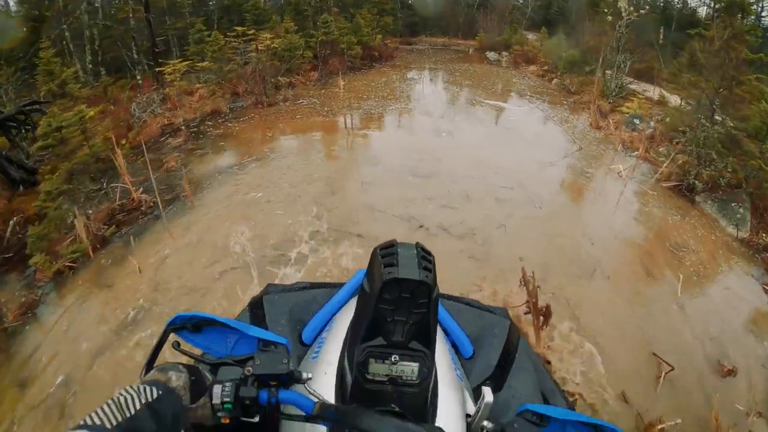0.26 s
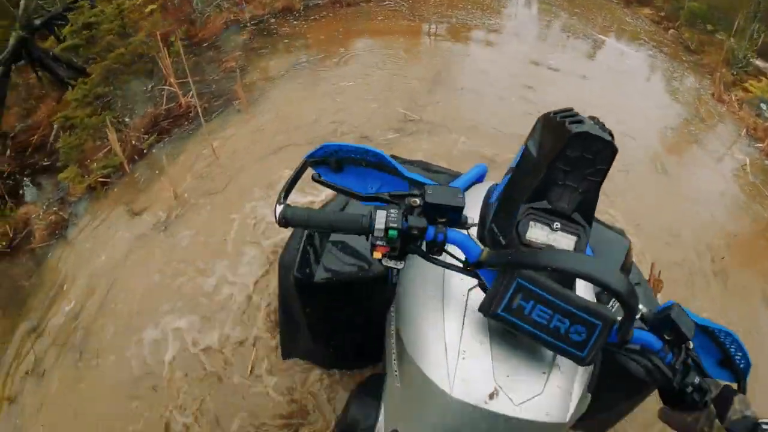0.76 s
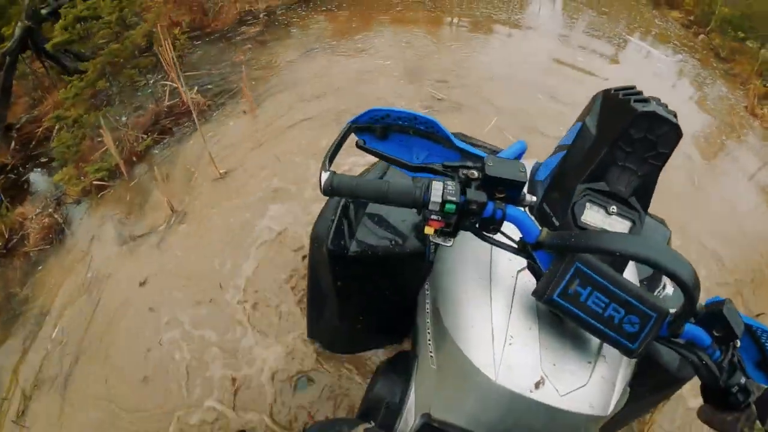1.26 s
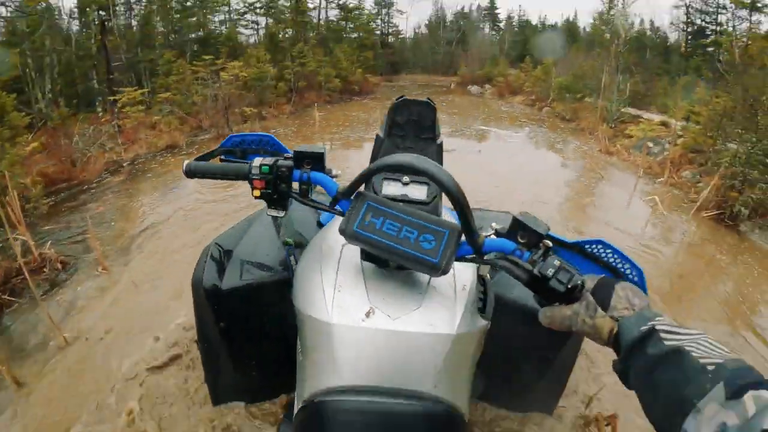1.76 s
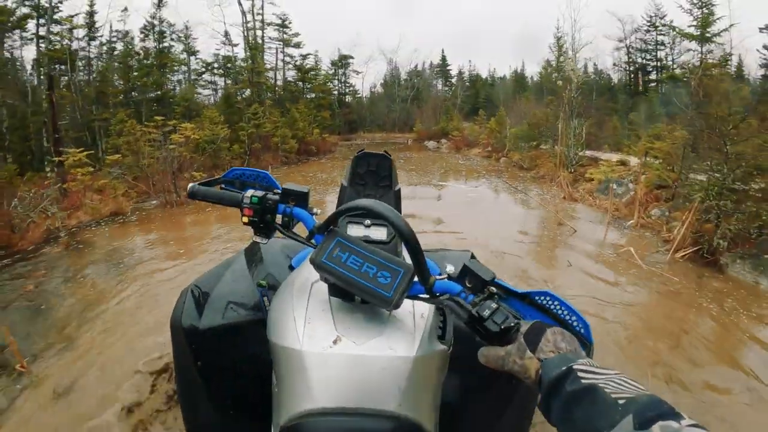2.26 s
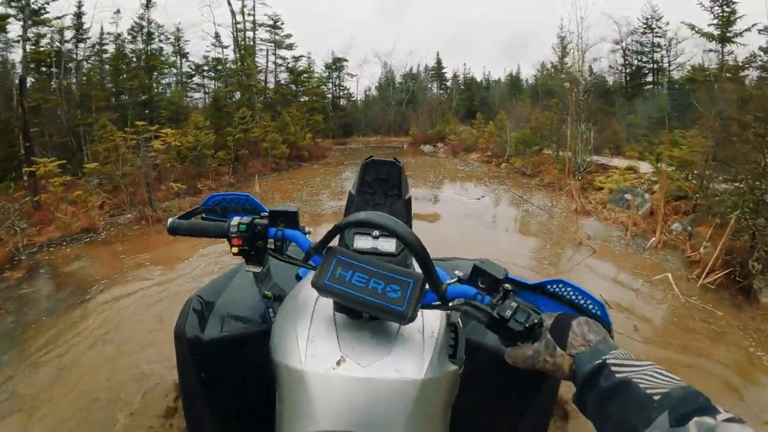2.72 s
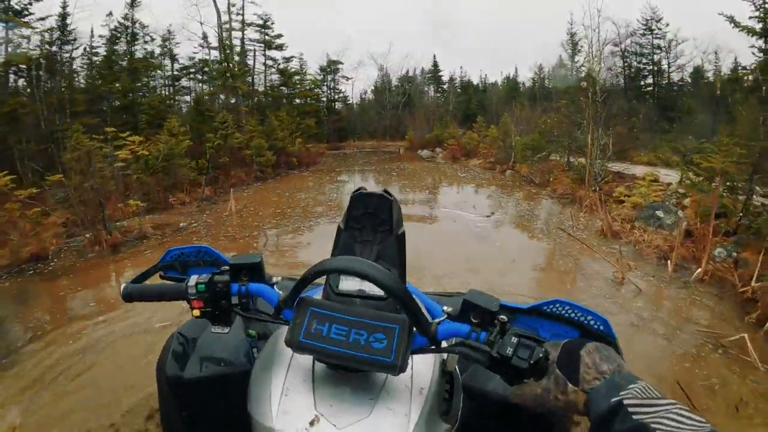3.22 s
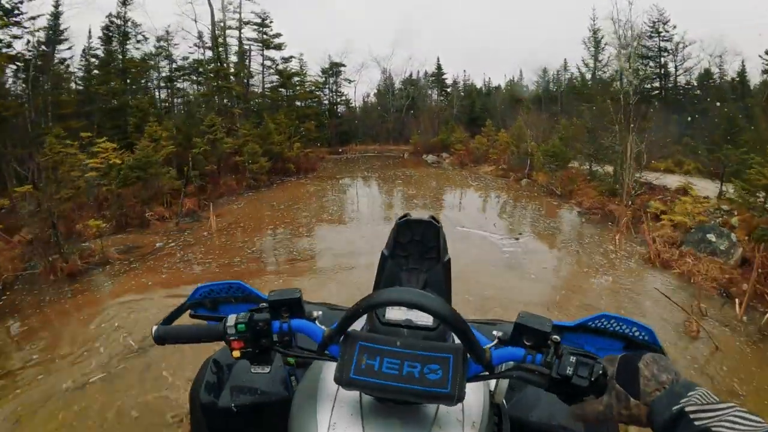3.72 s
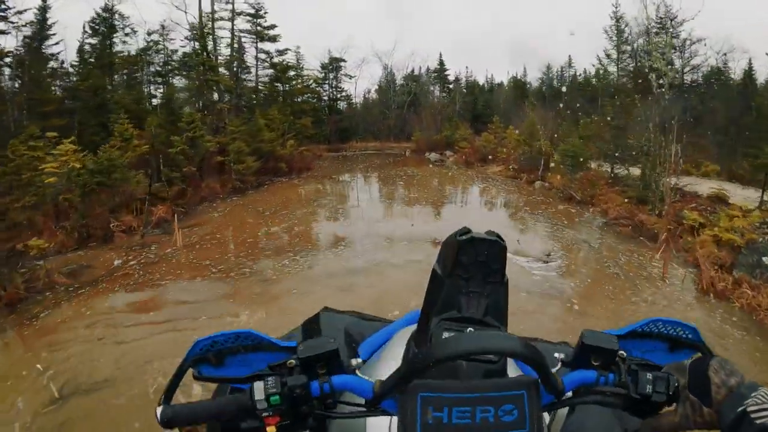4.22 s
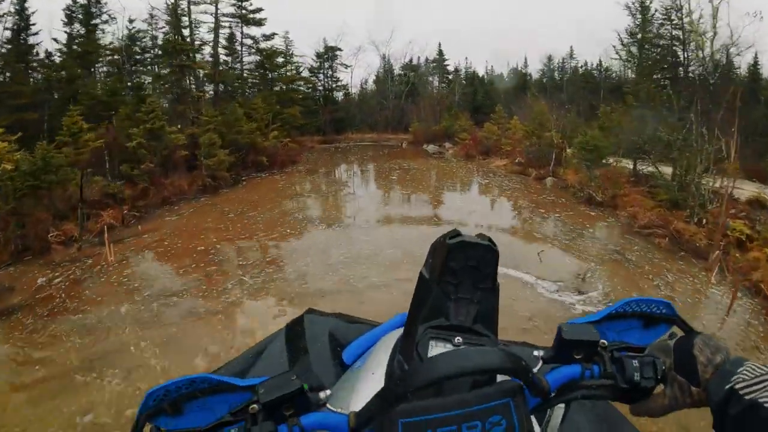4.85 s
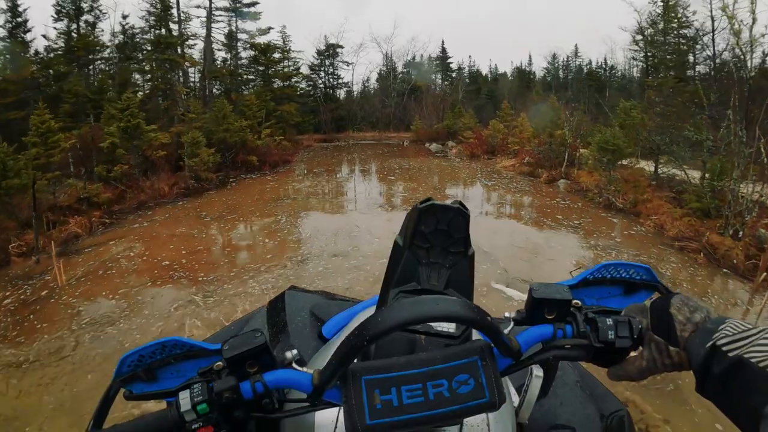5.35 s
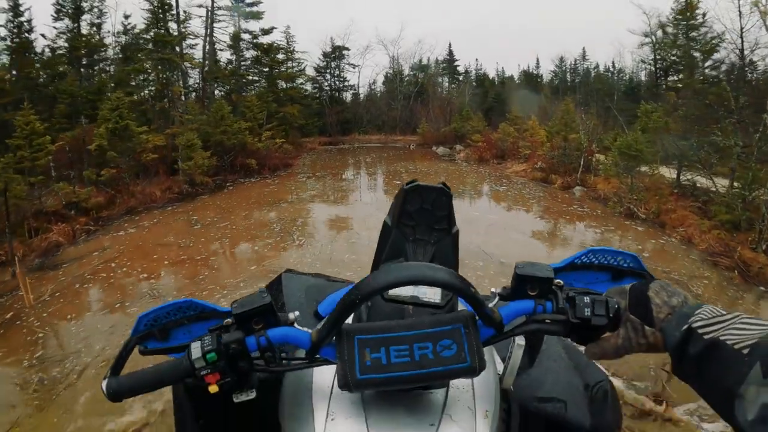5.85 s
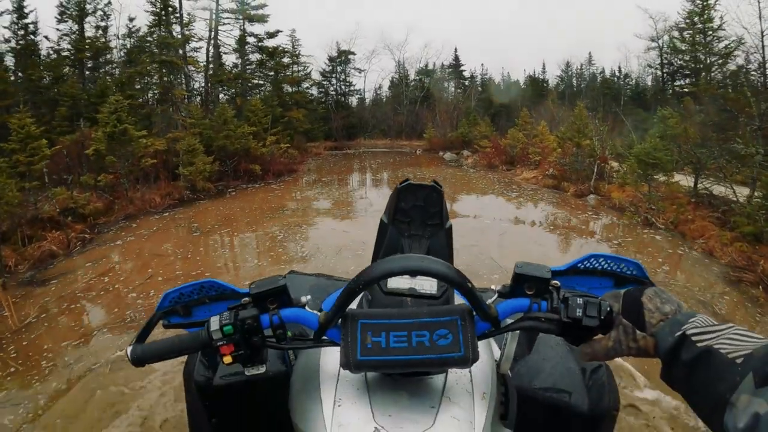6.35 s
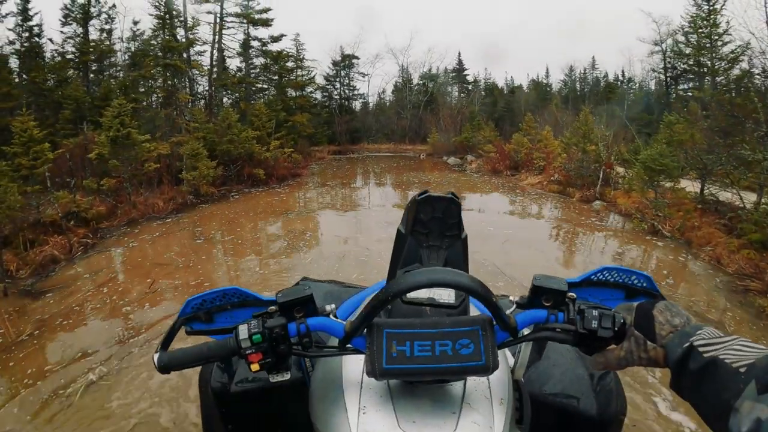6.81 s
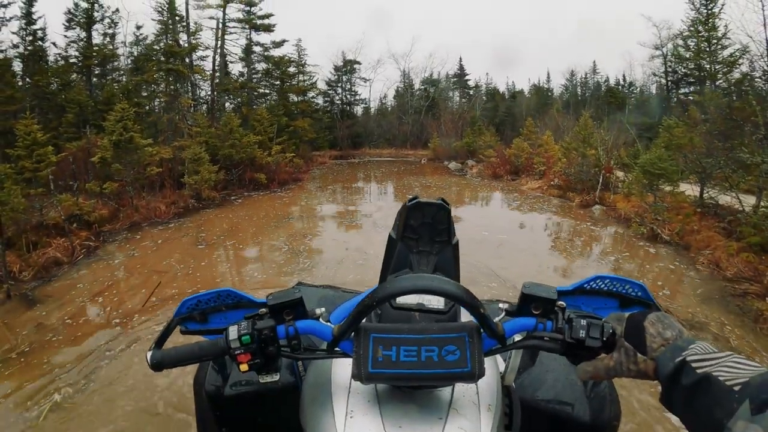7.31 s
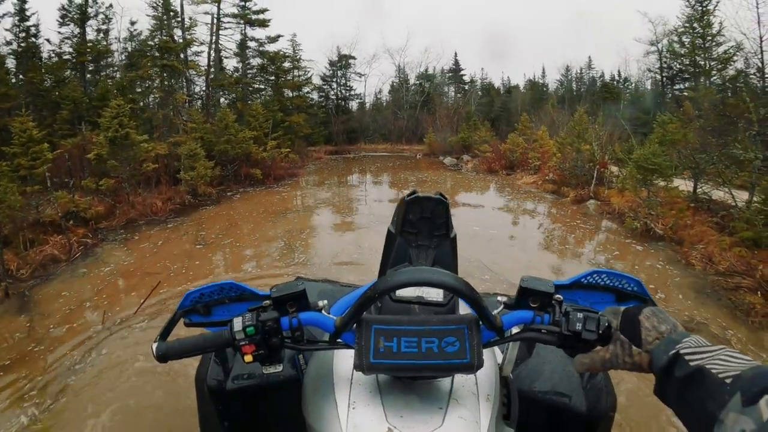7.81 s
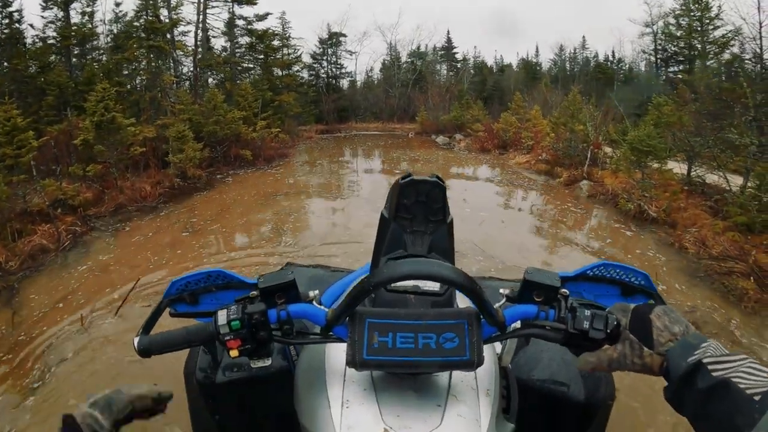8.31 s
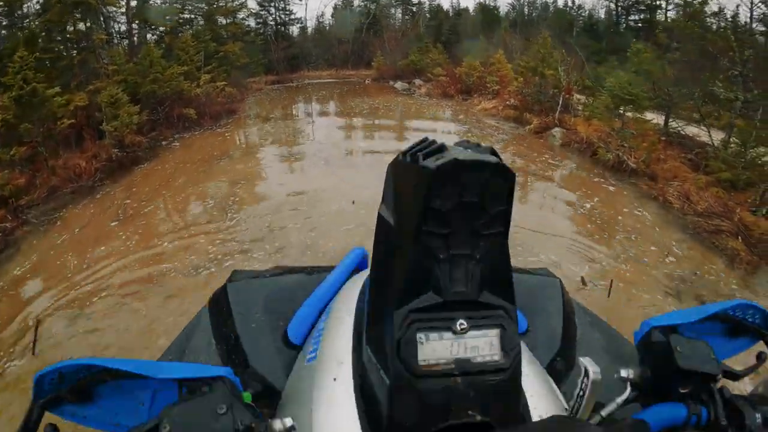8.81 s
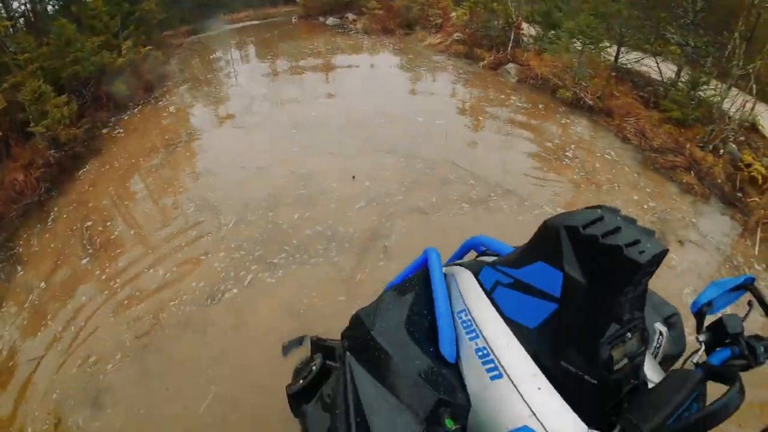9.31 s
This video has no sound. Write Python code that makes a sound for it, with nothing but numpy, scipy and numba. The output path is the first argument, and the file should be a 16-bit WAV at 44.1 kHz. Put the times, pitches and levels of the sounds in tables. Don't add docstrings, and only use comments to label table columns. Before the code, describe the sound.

Close mono helmet microphone, outdoors, little bass depth, soft treble. Uneven paired exhaust puffs dominate, with hollow intake gulps, ringing pipes and rattling casings. The engine revs briefly, sags, digs in and growls steadily through churning water for about four seconds, stutters, then idles slowly with breathy hisses each cycle. Light water fizz and a few drops on plastic sit far underneath.

```python
import sys
import numpy as np
from scipy import signal
from scipy.fft import rfft, irfft
from scipy.io import wavfile
from scipy.ndimage import uniform_filter1d
from numba import njit

SR = 44100
rng = np.random.default_rng(int(sys.argv[2]) if len(sys.argv) > 2 else 0)


def gain_from_decibels(decibels):
    exponent = np.asarray(decibels, float) / 20
    return 10 ** exponent


def bounce(signal):
    frames = np.transpose(np.atleast_2d(signal))
    limited = np.clip(frames, -1, 1)
    pcm = np.round(limited * 32767).astype(np.int16)
    wavfile.write(sys.argv[1], SR, pcm)


N = 422026
T = np.arange(N) / SR


# (time [s], four-stroke cycle rate [Hz])
SPEED = [(0.0, 18.008), (0.065, 18.626), (0.278, 26.928), (0.408, 17.783), (0.606, 14.26), (1.05, 13.903),
         (1.284, 18.486), (1.899, 17.583), (2.691, 18.048), (3.091, 21.374), (5.063, 19.045),
         (5.278, 20.405), (5.562, 14.142), (5.754, 18.152), (5.999, 14.012), (6.609, 12.935),
         (7.076, 11.032), (9.57, 11.427)]
# (time [s], change of cycle rate [Hz])
SPEED_BUMPS = [(0.48, 3.436), (1.832, 0.492), (2.513, 0.506), (3.636, 0.355), (3.838, -0.396), (4.128, 0.575),
               (4.428, 0.241), (4.961, 0.191), (7.449, 0.609), (7.978, -0.062), (8.296, 0.198), (9.104, -0.489),
               (9.524, -0.535)]


def crank_phase():
    cycles_hz = track(SPEED, T)[0] + swells([(s, .09, hz) for s, hz in SPEED_BUMPS], T)
    return .171 + np.cumsum(cycles_hz) / SR


REAR_CYCLES = dict(base=.372, revs=.008, damped=.003)
REAR_DB = dict(base=-1.5, flow=-5, clear=1.5, damped=3.5, revs=0.5, shut=0)
# (time [s], level [dB])
MISFIRES = [(.01, -13), (.025, -11), (.045, -11), (.065, -20), (.325, -11), (.348, -2), (.394, -5),
            (.412, -10), (.443, -11), (.606, -5.5), (.63, -12), (5.362, -19), (5.397, -5), (5.543, -26.5),
            (5.847, -13), (5.886, -6), (9.379, -5), (9.202, -0.5), (.297, -2), (.46, -2), (.51, -6),
            (.697, -10.5)]
# (time [s], delay after the front firing [cycles])
SUCTION = [(0, .64), (.19, .67), (.29, .69), (.4, .63), (.58, .565), (.72, .575), (.86, .59), (1.1, .61),
           (1.39, .603), (2.16, .605), (2.7, .602), (3.1, .645), (3.6, .64), (4.15, .615), (4.93, .616),
           (5.8, .615), (6.15, .58), (6.5, .58), (6.9, .655), (9.57, .655)]


def strokes(phase):
    cycle = np.arange(0, int(phase[-1]) + 1)
    front = np.interp(cycle, phase, T)
    rough_db, shut = track(BURN, front)
    chance = rng.standard_normal((8, len(cycle)))
    uneven = rough_db * chance
    idle = np.clip(rough_db - 1, 0, 1) * shut ** 4
    lope = idle * (-1) ** cycle
    rear_delay = follow(REAR_CYCLES, front) + .0015 * uneven[0] + .0125 * lope - .013 * idle
    back = np.interp(cycle + rear_delay, phase, T)
    fires = np.r_[front, back]
    rear_db = follow(REAR_DB, back) + .4 * uneven[2] + 1.8 * lope - 1.8 * idle
    uneven_db = np.r_[.2 * uneven[1], rear_db]
    for s, weak_db in MISFIRES:
        uneven_db[np.argmin(abs(fires - s))] = weak_db
    gulp_delay = track(SUCTION, front)[0] + .031 * lope + .003 * uneven[3]
    gulp = np.interp(cycle + gulp_delay, phase, T)
    return dict(front=front, back=back, fires=fires, gulp=gulp, idle=idle, lope=lope,
                chance=chance, uneven=uneven, uneven_db=uneven_db)


def by_cylinder(e, front, rear):
    return np.r_[front + 0 * e["front"], rear + 0 * e["back"]]


EXHAUST_DB = dict(base=-17.5, flow=6, clear=3, revs=0.05, shut=3)
PUFF_HZ = dict(base=172.1, clear=24.1, shut=-9.5, scatter=3.73)
PUFF_RISE_MS = dict(base=3.53, shut=0.048, damped=-0.14, clear=-1)
PUFF_FALL_MS = dict(base=2, shut=-0.073, damped=0.033, clear=-0.45)
ECHO_MS = dict(base=14.9, revs=-2.31, clear=-0.65, damped=-0.91, shut=0.45)
ECHO_DB = dict(base=-3.5, clear=-8.5, damped=1.4, shut=-2.5, revs=0.56)
REAR_ECHO_DB = dict(base=-4.5, clear=-3.4, damped=1, shut=2)
# (time [s], half width [s], change [Hz])
HOT_PUFFS = [
    (.2, .1, 13.5),
    (.75, .2, 4.1),
    (1.5, .3, 8),
    (3.0, .3, 2),
    (4.1, .3, 3),
    (4.9, .3, 4.3),
    (6.35, .3, 8),
]


def exhaust(e):
    fires, idle = e["fires"], e["idle"]
    size_db = follow(EXHAUST_DB, fires) + 8.5 + e["uneven_db"]
    hz = follow(PUFF_HZ, fires)
    echo_s = follow(ECHO_MS, fires) / 1000
    rise_ms = follow(PUFF_RISE_MS, fires) + by_cylinder(e, 0, .81)
    pipe = puffs(fires, size_db, hz + swells(HOT_PUFFS, fires), rise_ms, follow(PUFF_FALL_MS, fires))
    rear_echo_db = follow(REAR_ECHO_DB, e["back"]) + 5.5 * idle + 1.8 * e["lope"]
    echo_db = size_db + follow(ECHO_DB, fires) + by_cylinder(e, 0, rear_echo_db)
    echo_hz = .82 * hz * by_cylinder(e, 1, 1 + .2 * idle)
    pipe += puffs(fires + echo_s, echo_db, echo_hz, 4.5, by_cylinder(e, 1.98, 1.98 + 4 * idle))
    return pipe + puffs(fires + 2 * echo_s, size_db - 27, .31 * hz, .98, 8.7)


GULP_DB = dict(base=-7.5, flow=-3.5, revs=8.5, damped=-3.5)
BOX_HZ = dict(base=219.2, shut=-4.8, damped=8, clear=10, revs=-13)
BOX_RISE_MS = dict(base=3.03, shut=0.52, damped=0.1, revs=0.1)
BOX_RING_MS = dict(base=21.5, damped=-20.5)
SECOND_GULP_DB = dict(base=-15, shut=4, damped=3, revs=-0.5)
# (time [s], half width [s], level on the gulp [dB])
BOOMS = [(0.382, 0.014, 4), (0.64, 0.011, 15.5), (0.71, 0.83, -7), (1.62, 0.39, 8), (5.5, 0.1, -2.5),
         (0.46, .02, 0), (.72, .02, 6.5), (.79, .02, 5.5), (.857, .02, -1), (8.95, .03, -0.5),
         (4.95, .3, 2.5), (4.5, 0.22, 2.5)]
# (time [s], half width [s], change of note [Hz], change of ring [ms])
BOX_SHIFTS = [
    (1.49, .25, 14, 1.5),
    (2.301, 0.28, 0.56, -1.3),
    (3.1, .25, 0.5, 1.4),
    (3.8, .2, 9.5, -1),
    (4.341, .25, 6.1, -0.5),
    (4.954, 0.28, 13, -0.5),
    (.2, 0.15, 18, 0.5),
    (0.757, .2, 12, 0),
    (6.35, 0.45, 9.5, -1.5),
]


def air_box(e):
    gulp, idle, lope, uneven = e["gulp"], e["idle"], e["lope"], e["uneven"]
    out_db = follow(EXHAUST_DB, gulp)
    gulp_db = out_db + 10.5 + follow(GULP_DB, gulp) + swells(BOOMS, gulp)
    gulp_db = gulp_db + .55 * uneven[4] + .24 * lope - 2.5 * idle
    shift_hz = swells([(s, w, hz) for s, w, hz, ms in BOX_SHIFTS], gulp)
    shift_ms = swells([(s, w, ms) for s, w, hz, ms in BOX_SHIFTS], gulp)
    box_hz = (follow(BOX_HZ, gulp) + shift_hz) * (1 + .012 * uneven[5]) * (1 - .043 * idle)
    rise_ms = follow(BOX_RISE_MS, gulp) + 3.8 * idle
    ring_ms = (follow(BOX_RING_MS, gulp) + shift_ms) * gain_from_decibels(uneven[6] - 1.2 * lope - .66 * idle)
    box = -puffs(gulp, gulp_db, box_hz, rise_ms, np.clip(ring_ms, 2, 23), glide=.62 * idle)
    second_db = out_db + 11 + follow(SECOND_GULP_DB, gulp) - 3.5 * idle + .8 * uneven[1]
    box += puffs(gulp + 12.75 / 1000, second_db, 1.28 * follow(PUFF_HZ, gulp), 1.5, 2.1)
    boom = level(noise_band(follow(PUFF_HZ, T), 110., 130.), 0)
    rough_db, shut = track(BURN, T)
    return box + gain_from_decibels(follow(EXHAUST_DB, T) - 25 + 6 * rough_db - 5 * shut ** 4) * boom


HEADER_DB = dict(base=-44.5, flow=20, revs=1.3)
HEADER_HZ = dict(base=329.3, revs=43.5)
# (time [s], front lead [ms], rear lead [ms])
HEADER_LEAD = [(0, 2.9, 2.9), (.3, 2.4, 2.6), (1.0, 2.4, 3.6), (1.5, 2.4, 4.5), (2.3, 2.25, 5.1),
               (2.7, 2.36, 4.3), (3.0, 2.36, 3.54), (3.5, 2.75, 2.8), (3.8, 2.94, 3.05), (4.3, 2.34, 2.7),
               (4.55, 2.8, 3.3), (4.95, 2.5, 2.86), (5.3, 3.1, 3), (5.9, 1.7, 3.7), (9.57, 3.2, 4.2)]
# (time [s], half width [s], level [dB])
HEADER_SWELLS = [
    (.2, 0.063, 2),
    (1.45, 0.25, -8.5),
    (2.5, 0.36, 1),
    (3.2, 0.26, 5),
    (4, 0.44, 1.5),
    (5.1, 0.52, -3),
    (5.75, 0.23, -8.5),
]
# (time [s], half width [s], change [Hz])
HEADER_REVVED = (.2, 0.11, 36)


def headers(e):
    fires, gulp = e["fires"], e["gulp"]
    lead_ms = by_cylinder(e, track(HEADER_LEAD, e["front"])[0], track(HEADER_LEAD, e["back"])[1])
    ring_db = follow(HEADER_DB, fires) + e["uneven_db"]
    hz = (follow(HEADER_HZ, fires) + swells([HEADER_REVVED], fires)) * by_cylinder(e, 1, 1.01)
    fire_db = ring_db + swells(HEADER_SWELLS, fires) + 9 + by_cylinder(e, 0, 3)
    ring = puffs(fires - lead_ms / 1000, fire_db, hz, by_cylinder(e, 2.8, 3.6), by_cylinder(e, 2.6, 7))
    gulp_db = follow(HEADER_DB, gulp) - 4.5 + 5 * e["idle"] + 3 * e["lope"]
    ring += puffs(gulp + .003, gulp_db, 340, .59, 13)
    return ring - puffs(fires + .00216, ring_db - 5.5, 510, 8.7, 3.9)


BARK_DB = dict(base=-60.5, flow=15, damped=12, shut=15)
# (time [s], half width [s], level on the bark [dB])
BARK_SWELLS = [(.62, 0.37, -1), (2.9, 0.33, -6), (4.05, 0.29, 4.5), (5.48, 0.084, -15), (8.75, 0.21, -10.5),
               (9.45, 0.2, -8.5), (6.35, 0.16, 3), (.2, 0.17, -7), (1.7, 0.13, -4), (2.4, 0.27, -2),
               (9.015, .01, 3), (9.075, 0.011, -4), (9.165, 0.011, -10), (9.198, 0.0083, 2.5), (9.255, .012, -8),
               (4.17, 0.016, -1), (4.37, 0.018, -3)]


def bark(e):
    chance = e["chance"]
    edge = e["fires"] - .0047
    soft = track(BURN, edge)[1]
    rear_luck = chance[6] - 5 + 4 * track(BURN, e["back"])[1] + .5 * e["idle"] + 2 * e["lope"]
    edge_db = follow(BARK_DB, edge) + swells(BARK_SWELLS, edge) + 12 + e["uneven_db"]
    edge_db = edge_db + 1.5 * np.r_[chance[7], rear_luck]
    edge_hz = 620 - 165 * soft + swells([(9.1, .3, 140)], edge)
    edges = -puffs(edge, edge_db, edge_hz, .3 + 1.2 * soft, 1.4 + 1.6 * soft)
    shut = track(BURN, T)[1]
    rasp = level(noise_band(520, 220., 220.), 0)
    rasp = rasp - shut * svf(rasp, 820 + 0 * T, 400.)
    blowing = .25 + puffs(e["fires"], 0, 1, 3, 7) + puffs(e["gulp"], -3, 1, 4, 9)
    rasp_db = follow(BARK_DB, T) + swells(BARK_SWELLS, T) - 4 - 5 * shut + 1.5 * walk(40)
    return edges + gain_from_decibels(rasp_db) * blowing * rasp


CRACK_DB = dict(base=-63, labour=35.5)
# (time [s], half width [s], level [dB])
KNOCKS = [(.092, .01, 0), (.14, .012, 3), (1.09, 0.028, 11), (1.3, 0.072, 4), (1.381, .02, -6),
          (1.49, .02, 11), (1.8, 0.085, 10), (1.99, 0.023, 9), (2.103, .02, 2), (2.41, 0.059, -2.5),
          (2.74, 0.062, 5), (2.818, 0.011, 7), (4.02, .06, -4), (4.17, 0.05, -13), (4.37, 0.025, -11),
          (4.75, 0.027, 7), (4.93, .02, 1), (5.14, .02, -2), (5.27, .07, -7), (5.76, .03, 0)]


def crack(e):
    front, chance = e["front"], e["chance"]
    crack_db = follow(CRACK_DB, front) + swells(KNOCKS, front - .0045) + 2.5 + .7 * chance[5]
    return puffs(front - .005, crack_db, 1350 * gain_from_decibels(.5 * chance[4]), .25, 1.6)


HISS_DB = dict(base=-59.5, flow=3, revs=-8.5)
# (centre [Hz], width [Hz], level [dB])
DUCT = [(1070, 50, -8), (1290, 75, 0), (1450, 70, -1), (1600, 80, -4), (1760, 90, -11), (2330, 110, -15),
        (2920, 100, -17), (4330, 90, -20), (5580, 150, -15), (3650, 110, -18), (6770, 100, -24)]
# (time [s], half width [s], level over the hiss [dB])
SUCKS = [(.2, .06, 18), (1.07, 0.048, 6.5), (6.25, 0.26, 1.5), (7.2, 0.053, 5.5), (8.56, 0.033, 2.5),
         (8.82, 0.016, -8), (9.09, 0.093, 2.5), (9.26, 0.044, 3.5), (9.5, 0.15, -10), (.045, 0.011, 9),
         (.4, .015, 17), (7.6, 0.22, 0.5), (8.1, 0.26, -1.5), (8.35, 0.094, 1.5), (8.69, .03, 3.5)]
# (time [s], half width [s], level [dB])
DUCT_TOP = [
    (6.4, .25, -3.5),
    (7.1, 0.38, 3.5),
    (7.7, 0.16, -2.5),
    (8.45, 0.21, -1.5),
    (9.1, 0.23, 1),
]
# (time [s], half width [s], level [dB])
DUCT_WET = (10, .3, 13)


def throttle(phase):
    gate, sag = 0, 1
    strength = gain_from_decibels(rng.standard_normal((int(phase[-1]) + 1, 2)))
    for k, (opens, lasts, db, fall) in enumerate([(.071, .21, 2.2, .038), (.665, .22, 1.5, .14)]):
        u = (phase - opens) % 1 / lasts
        sag = sag + fall * np.where(u < 1.5, .5 - u, 0)
        stroke = np.clip(u * 12, 0, 1) * np.clip(1.5 - .72 * u, 0, 1) ** 2
        gate = gate + gain_from_decibels(db) * strength[phase.astype(int), k] * stroke
    duct = 0
    for hz, width, db in DUCT:
        centre = hz * (1 + .007 * walk(12)) * (sag if hz < 2000 else 1)
        note_db = db + 2 * walk(13)
        if hz > 2500:
            note_db = note_db + swells(DUCT_TOP, T)
        elif hz > 2000:
            note_db = note_db + swells([DUCT_WET], T)
        duct = duct + gain_from_decibels(note_db) * noise_band(centre, 2.2 * width, 6. * width)
    hiss_db = follow(HISS_DB, T) + swells(SUCKS, T) + 16
    return track(BURN, T)[1] * gain_from_decibels(hiss_db) * level(gate * duct, 0)


# (multiple of the cycle rate, level with the throttle shut [dB])
ROCKING = [(3, -41.5), (4, -36.5), (5, -35), (6, -41.5), (8, -34.5)]
# (time [s], half width [s], level [dB])
LURCHES = [
    (0.005, 0.022, -21),
    (0.434, .05, -31.5),
    (0.89, .15, -38),
    (5.456, 0.034, -41.5),
    (5.872, 0.044, -40),
]


def frame(phase):
    thud = level(svf(rng.standard_normal(N), 62 + 0 * T, 38.), 0)
    thud = thud * swells([(s, w, gain_from_decibels(db)) for s, w, db in LURCHES], T)
    rocking = sum(gain_from_decibels(db + 2.4 * walk(8.1)) * np.sin(2 * np.pi * k * phase) for k, db in ROCKING)
    return thud + track(BURN, T)[1] * rocking


# (time [s], length [s], level [dB], start [Hz], top [Hz])
SQUEALS = [
    (1.752, .18, -43, 1265, 1440),
    (1.708, .018, -44, 1270, 1270),
    (2.638, .2, -47, 1265, 1270),
    (5.368, .13, -42.5, 1440, 1370),
    (5.772, 0.13, -43, 1400, 1408),
]


def belt():
    settled_hz, width_hz, upper = 1265., 50., 2.6
    hz, gain = np.full(N, settled_hz), np.zeros(N)
    for s, lasts, db, start_hz, top_hz in SQUEALS:
        on = np.clip(np.minimum(T - s, s + lasts - T) / .01 + 1, 0, 1) ** 2
        glide = np.interp(T, [s, s + .443 * lasts, s + lasts], [start_hz, top_hz, settled_hz])
        hz = np.where(on > 0, glide, hz)
        gain += on * gain_from_decibels(db + 1)
    hz = hz * (1 + .012 * walk(80))
    note = level(noise_band(hz, width_hz, 4 * width_hz), 0)
    note = note + level(noise_band(upper * hz, upper * width_hz, 4 * upper * width_hz), -24)
    return gain * gain_from_decibels(2 * walk(40)) * note


def cycle_beat(phase):
    return gain_from_decibels(np.cos(2 * np.pi * (phase - .03)) + .62 * np.cos(4 * np.pi * (phase - .05)))


CLATTER_DB = dict(base=-49, revs=5, damped=6)
# (frequency [Hz], level [dB per Hz])
CLATTER = [(440, -25.5), (750, -17.5), (819, -3), (947, 1), (1030, 3.5), (1400, 4.5), (1830, -0.5),
           (1990, -11), (2400, -14), (3120, -50.5), (5280, -120)]


def clatter(phase):
    shut = track(BURN, T)[1]
    casing = coloured(rng.standard_normal(N) * gain_from_decibels(2 * walk(60)), CLATTER)
    casing = casing - .97 * shut * svf(casing, 810 + 0 * T, 420.)
    ring = level(svf(rng.standard_normal(N), 1445 * (1 + .0081 * walk(1.8)), 140.), -8.5)
    return cycle_beat(phase) * gain_from_decibels(follow(CLATTER_DB, T) - 2.5) * (casing + ring * (1 - shut))


WASH_DB = dict(base=-55, revs=2, damped=5)
# (time [s], half width [s], level over the wash [dB])
SURGES = [
    (0.1, 0.045, 3.5),
    (.44, 0.033, 5),
    (1.1, 0.047, 4),
    (2.2, 0.3, 0),
    (9.08, 0.14, 7.5),
]


def churn(phase):
    return cycle_beat(phase) * gain_from_decibels(follow(WASH_DB, T) + swells(SURGES, T) + 1.06)


# (time [s], half width [s], note [Hz], width [Hz], level [dB])
GEARS = [
    (3.5, .3, 2620, 55, -5),
    (4.0, .15, 2600, 60, -5),
    (4.3, .18, 2520, 100, -5),
    (4.6, .18, 2380, 150, -5),
    (5.1, .3, 2480, 140, -5),
    (5.15, .25, 2630, 60, -9),
    (5.36, .1, 3620, 55, -6),
    (3.9, .15, 2950, 60, -10),
    (1.3, .3, 2050, 200, -7),
    (1.1, 0.2, 2100, 230, -3),
]


def gear_case(phase):
    hum = 0
    for s, half_s, hz, width, db in GEARS:
        note = svf(rng.standard_normal(N), hz * (1 + .011 * walk(5.7)), 1. * width)
        hum = hum + swells([(s, half_s, 1)], T) * level(note, db)
    return churn(phase) * hum


# (frequency [Hz], level [dB per Hz])
WASH = [(1060, -26.5), (1800, -2.5), (2000, 1.5), (2190, -1), (2550, 0.5), (2780, -1.5), (3040, -1.5),
        (3640, -5), (3970, -5.5), (5080, -7.5), (7250, -13.5), (8910, -29.5), (9800, -17), (10400, -18.5),
        (11900, -45.5), (15500, -69), (22000, -120)]


def wash(phase):
    water = 0
    for hz in (2500., 5000., 10000.):
        drops = rng.standard_normal(N) * (1 + 1.8 * (rng.random(N) < 500 / SR))
        water = water + gain_from_decibels(1.7 * walk(25)) * svf(drops, hz + 0 * T, hz)
    return churn(phase) * coloured(water, WASH)


# (time [s], peak level [dB], centre [Hz])
SPLASHES = [
    (0.681, -31.5, 1630),
    (4.739, -38, 4130),
    (8.886, -38, 4940),
    (9.5221, -31.5, 2220),
]


def splashes():
    s, db, hz = np.transpose(SPLASHES)
    centre = np.clip(np.interp(T, s, hz), 500, 9000)
    spray = level(noise_band(centre, 1200., 2000.), 0)
    tick = level(svf(rng.standard_normal(N), 5000 + 0 * T, 6000.), 0)
    slap = puffs(s + .0019, db - .5, 9.2, .96, 2.3) * spray
    return slap + puffs(s[-2:], db[-2:] - 8, 10, .5, 1.5) * tick


def microphone_hiss():
    return level(noise_band(8200, 5000., 4200.), -67.5)


# (time [s], gas flow [0-1], labouring against the mud [0-1])
LOAD = [(0, 0.6, 0.05), (.1, 0.76, 0.94), (.3, 0.52, 0.36), (.43, 0, 0.65), (.65, 0.01, 0.1),
        (1.0, 0.37, 0), (1.15, 0.91, 1), (1.8, 0.68, 0.17), (2.1, 0.81, 0.88), (2.801, 0.9, 0.79),
        (3.05, 0.77, 0.7), (3.6, 0.63, 0.54), (5.298, 0.75, 0.87), (5.52, 0, 0.8), (5.7, 1, 0.95),
        (5.92, 0.2, 0.8), (6.45, 0.46, 0.7), (7.0, 0.29, .12)]
# (time [s], tail pipe clear of the water [0-1], air box walls damped by water [0-1])
WADE = [(0, 0.4, 0.88), (.3, 1, 0.87), (0.599, 0.03, 0.5), (1.0, 0.6, 0.26), (1.198, .95, 0.84),
        (1.898, 0.5, 0.58), (2.298, 0.1, 0.38), (2.8, 0.4, 0.8), (3.1, 0, 0.82), (3.999, 0.3, 0.83),
        (5.199, 0.8, 0.93), (5.45, 0.3, 0.56), (5.75, 1.05, 0.61), (5.92, 0, 0.52), (6.397, 0, 0.27),
        (6.9, 0, 0.2), (8, -.1, 0.3), (9.57, 0.7, 0.3)]
# (time [s], cycle-to-cycle scatter [dB], throttle shut [0-1])
BURN = [(0, 2, .3), (.1, 1, .1), (.3, 1, .1), (.4, 3, .4), (.68, 2.5, .4), (.8, 1, .5), (1.1, .8, .5),
        (1.3, .35, .1), (5.25, .35, .1), (5.4, 2.5, .3), (5.55, 2.5, .3), (5.65, .8, .1), (5.82, .8, .1),
        (5.88, 2.5, .5), (6.05, .8, .8), (6.6, .8, 1), (6.9, 2, 1), (9.57, 2.3, 1)]


def follow(law, t):
    flow, labour = track(LOAD, t)
    clear, damped = track(WADE, t)
    scatter, shut = track(BURN, t)
    revs = (track(SPEED, t)[0] - 11) / 10
    control = dict(base=1, flow=flow, labour=labour, clear=clear, damped=damped,
                   scatter=scatter, shut=shut, revs=revs)
    return sum(change * control[name] for name, change in law.items())


def track(table, t):
    s, *columns = np.transpose(table)
    return [np.interp(t, s, column) for column in columns]


def swells(rows, t):
    return sum(h * np.exp(-.5 * ((t - s) / w) ** 2) for s, w, h in rows)


def puffs(times, db, hz, rise_ms, fall_ms, glide=0):
    tail = 4400
    out = np.zeros(N + tail)
    for t, gain, f, rise, fall, bend in np.broadcast(times, gain_from_decibels(db), hz, rise_ms, fall_ms, glide):
        if rise / 200 < t < N / SR:
            i = int(t * SR) + np.arange(-int(rise * SR / 200), min(tail, int(fall * SR / 200)))
            u = i / SR - t
            bell = np.exp(-.5 * (u * 1000 / np.where(u < 0, rise, fall)) ** 2)
            out[i] += gain * np.cos(2 * np.pi * f * u * (1 + bend * u)) * bell
    return out[:N]


def level(x, db):
    return x * gain_from_decibels(db) / np.sqrt(np.mean(x ** 2))


@njit
def svf(x, hz, width):
    y, b, l = np.empty(len(x)), 0., 0.
    for i in range(len(x)):
        g, k = np.tan(np.pi * hz[i] / SR), width / hz[i]
        v = (b + g * (x[i] - l)) / (1 + g * (g + k))
        b, l, y[i] = 2 * v - b, l + 2 * g * v, k * v
    return y


def noise_band(hz, width, second_width):
    centre = hz + 0 * T
    return svf(svf(rng.standard_normal(N), centre, width), centre, second_width)


def walk(rate):
    k = int(SR / rate)
    held = np.repeat(rng.standard_normal(N // k + 1), k)
    return 1.3 * uniform_filter1d(uniform_filter1d(held, k), k)[:N]


def coloured(x, spectrum):
    hz, db = np.transpose(spectrum)
    f = np.arange(N // 2 + 1) * SR / N + 1
    return level(irfft(rfft(x) * gain_from_decibels(np.interp(np.log(f), np.log(hz), db)), N), 0)


def scene():
    phase = crank_phase()
    e = strokes(phase)
    engine = exhaust(e) + air_box(e) + headers(e) + bark(e) + crack(e)
    machine = throttle(phase) + frame(phase) + belt() + clatter(phase) + gear_case(phase)
    return (engine + machine + wash(phase) + splashes() + microphone_hiss())[None]


def top_cut(x):
    return signal.sosfilt(signal.butter(12, 13800, fs=SR, output="sos"), x)


def record(dry):
    x = signal.sosfilt(signal.butter(3, 58, "high", fs=SR, output="sos"), dry)
    x = signal.lfilter(*signal.iirnotch(9100, 9, fs=SR), x)
    x = np.tanh(.48 * x) / .57
    return top_cut(x)


dry = scene()
out = record(dry)
bounce(out)
```